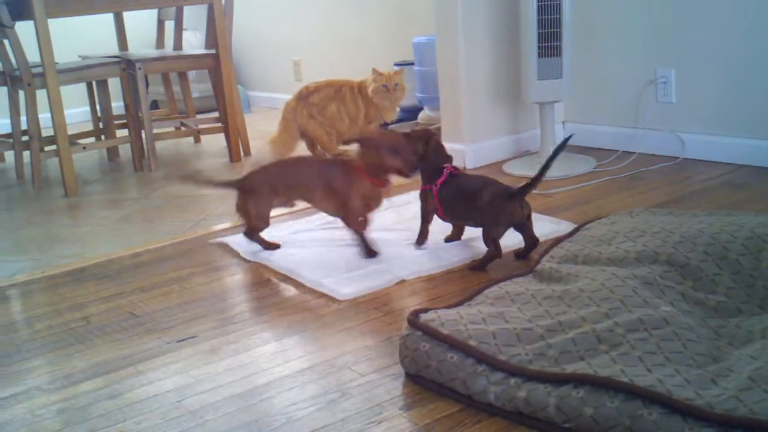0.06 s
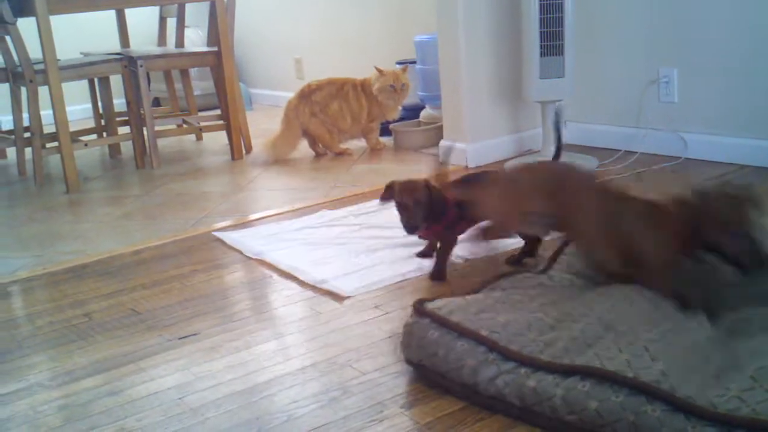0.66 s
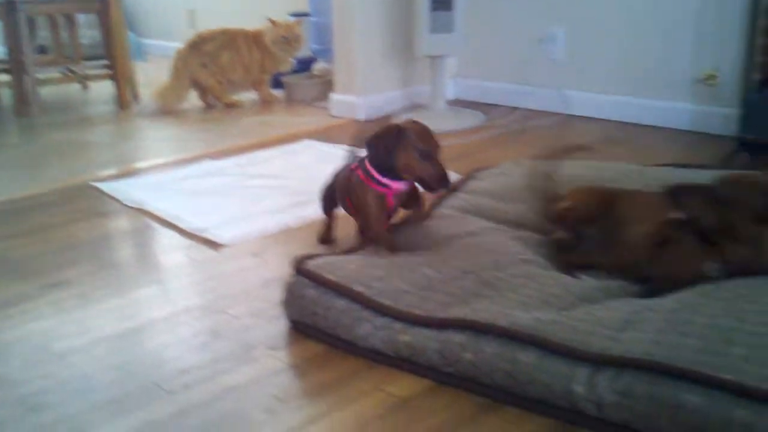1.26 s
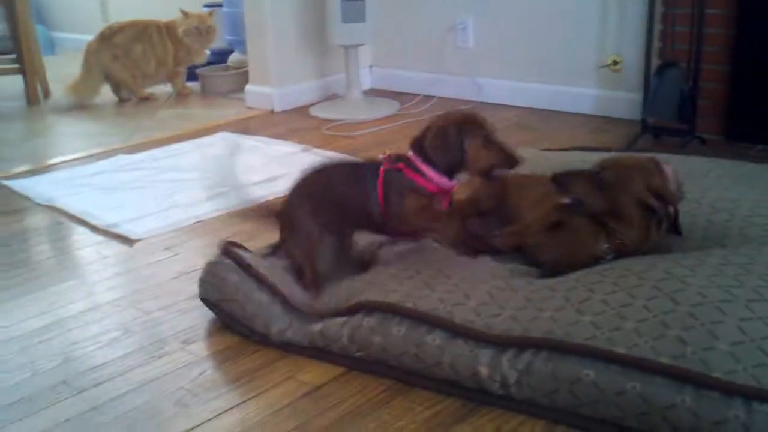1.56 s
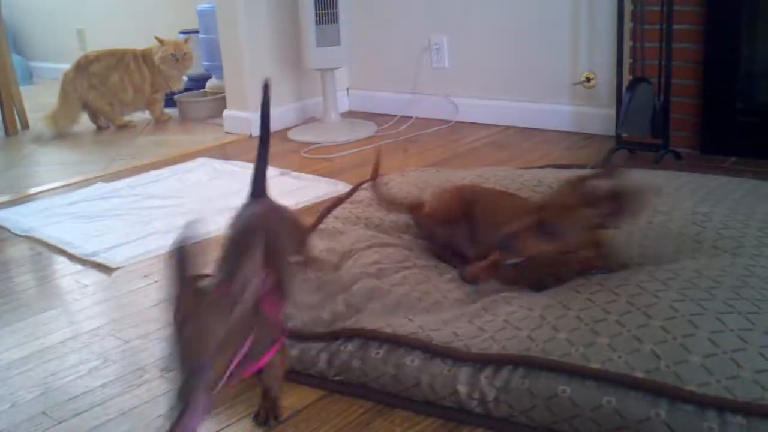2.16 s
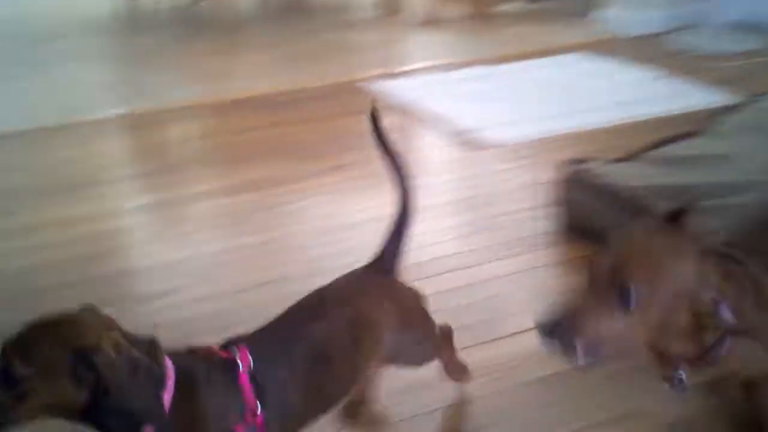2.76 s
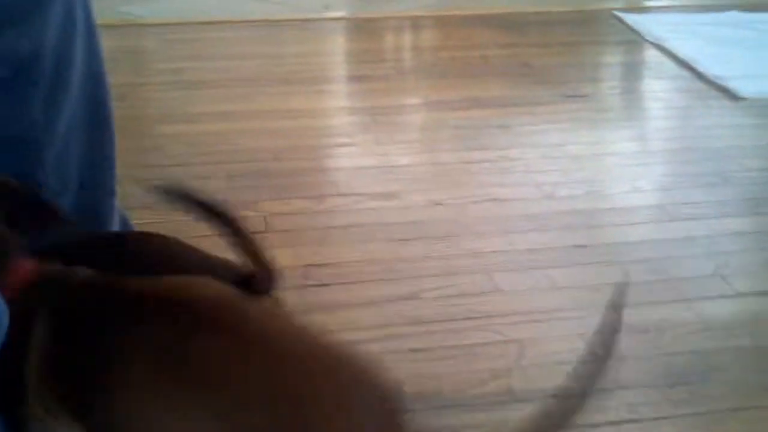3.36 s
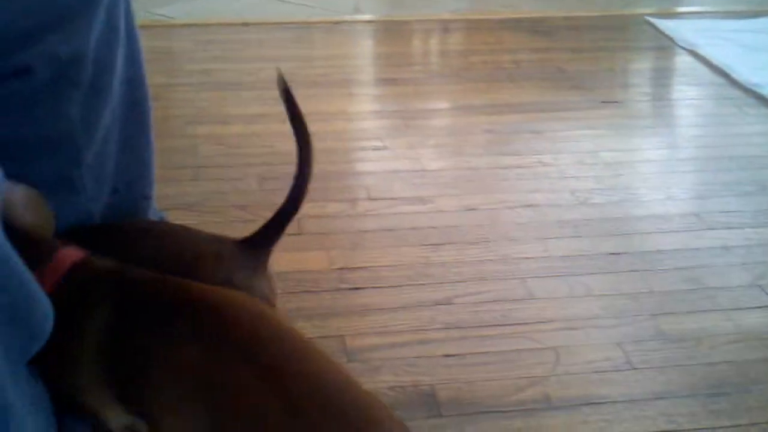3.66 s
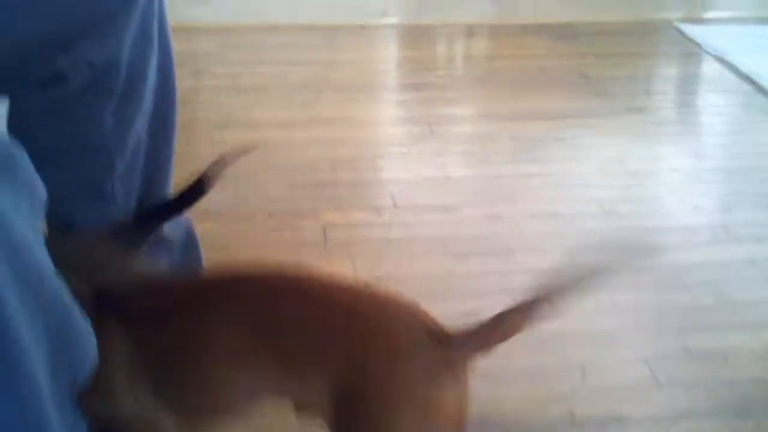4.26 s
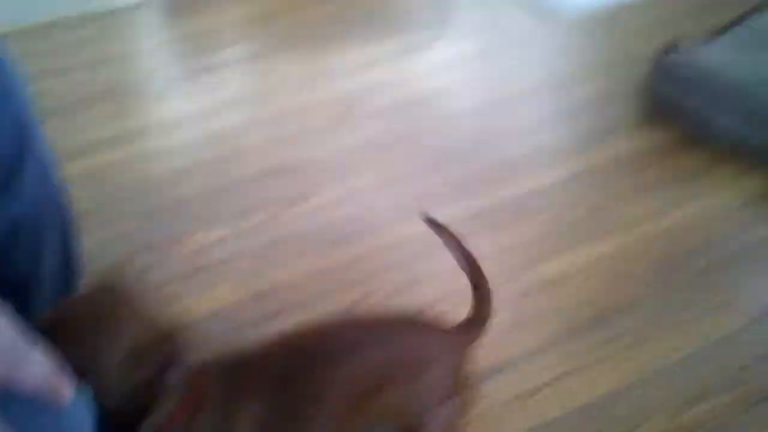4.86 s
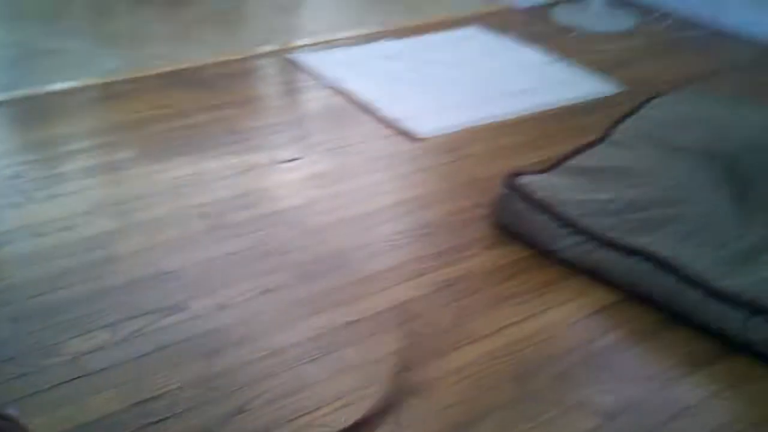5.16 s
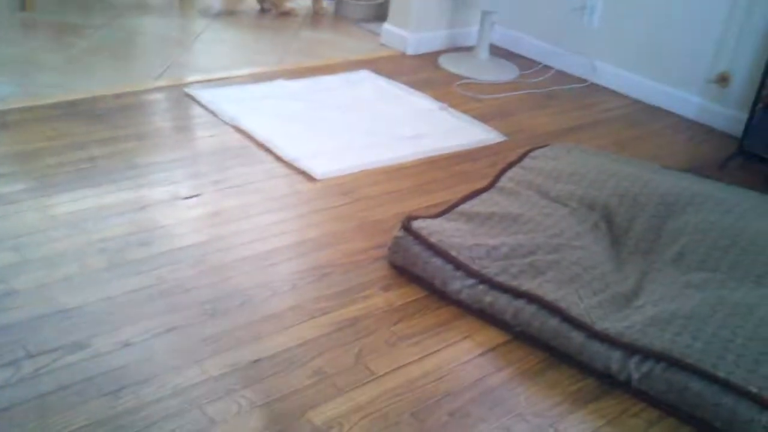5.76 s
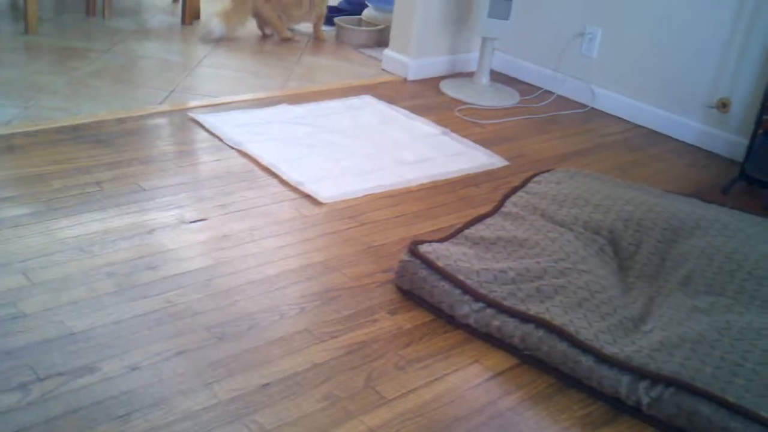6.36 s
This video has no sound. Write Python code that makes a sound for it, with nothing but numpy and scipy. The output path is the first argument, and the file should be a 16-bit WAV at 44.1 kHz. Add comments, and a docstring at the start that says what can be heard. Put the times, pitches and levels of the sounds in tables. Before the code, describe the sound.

Two small dogs tussle quietly in a bare living room, with soft paw thumps, a rustling floor pad and fur rubbing on a cushion. Then they scamper across the wooden floor close past the microphone, claws clicking and scraping sharply while a metal collar tag clinks. A few dry knocks and more clicks follow as they jostle, before the sound settles to soft brushing over faint house rumble.

```python
"""Two small dogs scuffling indoors.

They tussle on a cushion, scamper over a wooden floor past the microphone and jostle at someone's legs.
Claws click and scrape, paws thump the boards, a collar tag clinks, a floor pad rustles, fur and cloth
rub. A bare living room rings after each hit. Crossfeed widens the image of two close microphone ports."""
import sys
import numpy as np
from scipy import signal
from scipy.fft import rfft, irfft, next_fast_len
from scipy.io import wavfile
from scipy.ndimage import uniform_filter1d

SR = 44100
rng = np.random.default_rng(int(sys.argv[2]) if len(sys.argv) > 2 else 0)


def digitize_waveform(pressure):
    """Quantize a signal to 16-bit integers and store it at the path in sys.argv[1].

    Rows of a 2-D input are taken as channels; values are limited to [-1, 1].
    """
    field = np.atleast_2d(pressure).T
    bounded = np.clip(field, -1, 1)
    quanta = np.round(bounded * 32767).astype(np.int16)
    wavfile.write(sys.argv[1], SR, quanta)


N = 282681
HIT_N = SR // 2
T = np.arange(N) / SR
HIT_T = T[:HIT_N]


def undb(db):
    """Decibels to gain."""
    return 10 ** (np.asarray(db) / 20)


def along(points, hz):
    """Read (frequency [Hz], value) points on a log-frequency axis."""
    point_hz, value = np.transpose(points)
    return np.interp(np.log(hz + 1), np.log(point_hz), value)


def colour(x, points):
    """Minimum-phase filter through (frequency [Hz], gain [dB]) points."""
    size = 2 * next_fast_len(x.shape[-1], real=True)
    gain = undb(along(points, np.fft.rfftfreq(size, 1 / SR)))
    cepstrum = irfft(np.log(gain))
    cepstrum[1:size // 2] *= 2
    cepstrum[size // 2 + 1:] = 0
    return irfft(rfft(x, size) * np.exp(rfft(cepstrum)))[..., :x.shape[-1]]


def band(x, hz, q):
    """One resonance, at most at SR / 4."""
    return signal.lfilter(*signal.iirpeak(min(hz, SR / 4), max(q, .5), fs=SR), x)


def bell(hz, centre_hz, reach_oct):
    """Gaussian weight over octaves."""
    return np.exp(-(np.log2(hz / centre_hz) / reach_oct) ** 2)


def unit(x):
    """Scale to rms 1."""
    return x / np.sqrt(np.mean(x ** 2))


def peak(x, db):
    """Scale the loudest 2 ms to this level."""
    power = uniform_filter1d(np.mean(np.atleast_2d(x) ** 2, axis=0), size=88)
    return x * undb(db) / np.sqrt(power.max())


def fade(t60_s, t=HIT_T):
    """Exponential decay."""
    return np.exp(-np.log(1000) * t / np.maximum(t60_s, 1e-4))


def swell(length_s):
    """Half sine: a stroke gathers speed and slows."""
    return np.sin(np.pi * np.minimum(HIT_T / length_s, 1))


def add(track, start_s, sound):
    """Mix a sound into the track."""
    start = max(int(start_s * SR), 0)
    track[:, start:start + sound.shape[-1]] += sound[..., :N - start]


# Port difference against port sum: (frequency [Hz], gain [dB])
SIDE_SPECTRUM = [(60, 24.5), (130, -1), (280, 5.5), (600, -2.5), (1200, 1.5), (2500, 2), (10000, -0.5)]


def ports(pair):
    """Two unrelated signals become a diffuse field at the two ports."""
    side = colour(pair[1], SIDE_SPECTRUM)
    return np.array([pair[0] + side, pair[0] - side]) / np.sqrt(2)


def diffuse_noise(samples):
    """Noise arriving from all sides."""
    return ports(rng.standard_normal((2, samples)))


def friction(slips_per_s, scatter_db, spectrum, uneven_db):
    """Tiny slips of unequal size, coloured by what is rubbed, under wandering pressure."""
    sizes = undb(scatter_db * np.minimum(rng.exponential(size=N), 4))
    slips = sizes * (rng.random(N) < slips_per_s / SR)
    knots_s = np.arange(0, T[-1], .03)
    pressure = undb(uneven_db * np.interp(T, knots_s, rng.standard_normal(len(knots_s))))
    grains = ports(rng.standard_normal((2, N)) * slips)
    return pressure * unit(colour(grains, spectrum))


# Claw strikes: (time [s], peak [dB], treble [dB], ring [Hz], left minus right [dB])
CLAW_HITS = [(0.245, -53.5, -7, 3900, -4), (0.498, -53.5, -2, 6800, 3), (0.69, -57, -3, 4000, -2),
             (0.715, -57, -5, 4400, 0), (2.2734, -35, 10.5, 6760, 0), (2.527, -48, -2, 6500, 1),
             (2.548, -48, -8, 8950, -1), (2.589, -51, 1, 8900, -4), (2.613, -44, 6, 11400, -1),
             (2.6313, -40, 2, 9000, -11), (2.6994, -27, -5.5, 8100, -4), (2.7203, -24.5, 2.5, 3800, 3),
             (2.8161, -31, -7, 9800, 1), (2.887, -45.5, -2, 6300, -2), (2.941, -44, -16, 9000, 2),
             (2.951, -39.5, -8, 3900, -1), (2.9698, -32, -4, 8900, 1), (2.9754, -36.5, -5, 9250, 8),
             (3.023, -39, -6, 10500, 5), (3.0276, -22, 5.5, 8450, -0.5), (3.0303, -39, -9, 11500, 4),
             (3.041, -51, -9, 11600, 1), (3.051, -37, -6, 6900, 10), (3.0618, -33, -8.5, 8800, 3),
             (3.076, -46, -5, 9300, -3), (3.213, -43, -1, 11900, 3), (3.227, -41, -2, 7500, 2),
             (3.245, -30.5, 10, 7470, 2), (3.2505, -37, -13.5, 9200, 12.5), (3.256, -39, -1, 8100, -16),
             (3.272, -39.5, -10, 9000, 7), (3.881, -46.5, -4, 8350, 0), (4.132, -51.5, -14, 3100, 5),
             (4.601, -53, -30, 3430, 0), (4.6286, -46.5, -17.5, 4300, 0), (4.758, -59, 16, 13000, -2),
             (4.8306, -47, 23, 12500, 0), (4.926, -32.5, 2, 8750, 0), (4.9298, -38.5, 0, 11300, -8.5),
             (4.942, -43, -8, 11500, 2), (4.948, -49, -3, 3830, 14)]
# Claw on varnish: (frequency [Hz], gain [dB])
CLAW_SPECTRUM = [(300, 0), (1500, -21), (2800, -0.5), (3800, -3), (5200, -6.5), (6800, -1), (9000, -2),
                 (11500, -1.5), (14000, -5.5)]


def claws(rise_s=0.005, crack_t60_s=0.012, skid_db=-27, skid_t60_s=0.13, slips_per_s=1800, ring_db=4):
    """Each claw cracks on the varnish, rings at its own pitch and skids on in a fading chatter."""
    out = np.zeros((2, N))
    for time_s, db, treble_db, ring_hz, pan_db in CLAW_HITS:
        crack, chatter = rng.standard_normal((2, 2, HIT_N))
        slips = unit(rng.random(HIT_N) < slips_per_s / SR)
        skid = undb(skid_db) * chatter * slips * fade(skid_t60_s)
        hit = (crack * fade(crack_t60_s) + skid) * (1 - fade(rise_s)) ** 2
        hit += undb(ring_db) * band(hit, ring_hz, q=5)
        hit = colour(hit, CLAW_SPECTRUM)
        hit = colour(hit, [(3000, 0), (10000, treble_db)])
        pan = undb([[pan_db / 2], [-pan_db / 2]])
        add(out, time_s, peak(hit, db) * pan)
    return out


# Paw landings: (time [s], peak [dB], centre [Hz], base t60 [s], reach [oct])
PAW_HITS = [(0.094, -53, 139, 0.078, 0.35), (0.346, -48, 244, 0.1, 1), (0.471, -49, 860, 0.051, 0.85),
            (0.483, -43.5, 185, 0.058, 1.8), (0.506, -45.5, 230, 0.1, 1.3), (0.793, -44, 292, 0.06, 0.78),
            (0.875, -49, 302, 0.15, 0.81), (1.002, -48, 286, 0.22, 0.93), (1.14, -50, 364, 0.22, 2.9),
            (1.185, -45, 219, 0.097, 0.82), (1.205, -54, 242, 0.092, 0.78),
            (1.252, -49.5, 132, 0.043, 0.72), (1.335, -49.5, 310, 0.24, 0.68),
            (1.565, -54, 267, 0.12, 0.31), (1.661, -45.5, 450, 0.095, 0.58),
            (2.135, -46.5, 520, 0.076, 0.96), (2.389, -46, 218, 0.2, 0.86), (2.697, -43.5, 337, 0.15, 1.4),
            (2.716, -38.5, 264, 0.14, 2.7), (2.732, -40, 236, 0.042, 0.41),
            (2.792, -35.5, 742, 0.038, 0.25), (2.796, -29, 415, 0.088, 0.19), (2.802, -46, 143, 0.32, 0.59),
            (2.82, -50, 420, 0.13, 0.43), (2.953, -41.5, 260, 0.12, 1.8), (3.003, -40, 265, 0.049, 1.7),
            (3.096, -31, 216, 0.05, 1.03), (3.109, -37.5, 300, 0.05, 1.4), (3.193, -53, 171, 0.044, 0.43),
            (3.2265, -35.5, 337, 0.07, 0.79), (3.255, -41, 255, 0.072, 0.57), (3.371, -47, 980, 0.031, 0.7),
            (3.396, -41.5, 257, 0.096, 0.35), (3.414, -48.5, 118, 0.034, 1),
            (3.537, -51.5, 227, 0.073, 3.9), (4.523, -46, 490, 0.046, 0.31),
            (4.603, -46.5, 417, 0.019, 1.3), (4.926, -48.5, 594, 0.19, 1.7)]
# Floorboard modes: (frequency [Hz], level [dB], t60 over base t60 [ratio])
BOARD_MODES = [(115.4, -1.5, 5.3), (143, -4.5, 4.3), (184.7, 0, 0.92), (240.5, 2, 0.95), (304, -1, 1.12),
               (371, -4.5, 1.27), (413.6, -3.5, 0.95), (505.6, -1, 1.3), (571, -5.5, 2.2), (651, -2, 0.66),
               (760, -5, 1.2), (976, 2.5, 0.6), (1236, -24, 0.28), (1710, 9, 0.15)]


def paws(pad_db=-6, pad_t60_s=0.04, rise_s=0.0033, shape_spread=0.49, detune_hz=6):
    """A soft pad slaps the floor; its softness picks which board modes answer."""
    out = np.zeros((2, N))
    mode_hz, mode_db, t60_ratio = np.transpose(BOARD_MODES)[:, :, None]
    for time_s, db, centre_hz, t60_s, reach_oct in PAW_HITS:
        shape = rng.choice([-1, 1], mode_hz.shape) + shape_spread * rng.standard_normal((2, *mode_hz.shape))
        weight = undb(mode_db) * bell(mode_hz, centre_hz, reach_oct)
        spot_hz = mode_hz + detune_hz * rng.standard_normal(mode_hz.shape)  # each spot has its own tuning
        modes = shape * weight * fade(t60_s * t60_ratio) * np.sin(2 * np.pi * spot_hz * HIT_T)
        pad = band(diffuse_noise(HIT_N) * fade(pad_t60_s), centre_hz, q=1 / reach_oct)
        thump = peak(modes.sum(axis=1), 0) + peak(pad, pad_db)
        add(out, time_s, peak(thump * (1 - fade(rise_s)), db))
    return out


# Close knocks: (time [s], peak [dB], clack [Hz], thud trim [dB], crack [dB])
KNOCK_HITS = [(1.662, -47, 514, -12, -11), (2.721, -34, 1650, 2, -8), (3.0972, -34, 624, -6, -9),
              (3.2272, -41.5, 770, -3.5, -16), (3.8765, -26.5, 1000, 6, -12.5), (4.134, -49, 1700, -4, 0),
              (4.497, -53.5, 1520, -21, -16), (4.5134, -40.5, 500, -18, -24), (4.595, -39, 706, 4, 5),
              (4.6016, -39, 1430, 0.5, -0.5), (4.6279, -39.5, 870, -18, -6), (4.683, -53.5, 950, -12, -9),
              (4.778, -45, 627, 3.5, 2), (4.7825, -53, 1100, -6, -10), (5.442, -65, 880, -10, -2)]


def knocks(clack_cycles=8, clack_rise_s=0.0056, thud_hz=215, thud_db=3, thud_lag_s=0.0029):
    """A dry clack and a crack, then a low thud that rocks the ports against each other."""
    out = np.zeros((2, N))
    thud_t = np.maximum(HIT_T - thud_lag_s, 0)
    thud_envelope = fade(0.011, thud_t) * (1 - fade(0.0046, thud_t))
    thud = np.sin(2 * np.pi * thud_hz * thud_t) * thud_envelope * np.array([[-0.3], [1]])
    for time_s, db, hz, trim_db, crack_db in KNOCK_HITS:
        clack = np.sin(2 * np.pi * hz * HIT_T) * fade(clack_cycles / hz) * (1 - fade(clack_rise_s))
        crack = band(diffuse_noise(HIT_N) * fade(t60_s=0.1), 0.55 * hz, q=1)
        knock = peak(clack, 0) + peak(crack, crack_db) + peak(thud, thud_db + trim_db)
        add(out, time_s, peak(knock, db))
    return out


# Tag striking its ring: (time [s], level [dB], lower mode [dB], overall t60 [s], free ringing [s])
TAG_HITS = [(0.186, -56, 0, .2, .07), (0.62, -60, 3, .15, .04), (2.228, -58, -2, .12, .03),
            (2.578, -39.5, -18, .035, .004), (2.613, -38.5, -22, .06, .006), (2.6325, -25.5, -21, .6, .018),
            (2.685, -40, -14, .3, .035), (3.214, -33, -14, .035, .003), (3.305, -34, -2, .04, .005),
            (3.57, -59, -5, .08, .03)]
# Tag modes: (lower [Hz], middle [Hz], upper [Hz])
TAG_MODES_HZ = (6400, 7410, 9000)


def collar_tag(lower_t60_s=0.49, choke_t60_s=0.09, upper_t60_s=0.014, upper_db=-4, port_lag_s=3.4e-5):
    """A metal tag clinks in three modes; the top one dies at once, fur chokes the middle one."""
    out = np.zeros((2, N))
    port_t = HIT_T - np.array([[0], [port_lag_s]])  # the tag hangs to one side
    for time_s, db, lower_db, t60_s, free_s in TAG_HITS:
        lower, middle, upper = (np.sin(2 * np.pi * hz * port_t) for hz in TAG_MODES_HZ)
        lower *= undb(lower_db) * fade(lower_t60_s)
        middle *= fade(choke_t60_s, np.maximum(HIT_T - free_s, 0))
        upper *= undb(upper_db) * fade(upper_t60_s)
        add(out, time_s, undb(db) * (lower + middle + upper) * fade(t60_s))
    return out


# Claw drags: (time [s], peak [dB], length [s], centre [Hz])
CLAW_DRAGS = [(0.837, -72, .07, 1510), (1.113, -55, .022, 1700), (2.948, -49, .022, 1420),
              (2.971, -45, .012, 1630), (2.99, -46, .012, 1120), (3, -51, .028, 1390),
              (3.024, -43.5, .008, 1250), (3.042, -52, .022, 1470), (3.250, -46, .014, 1040),
              (3.309, -55.5, .03, 1060)]
# Wood modes under a claw: (frequency [Hz], level [dB], Q)
WOOD_MODES = [(815, 23, 8.7), (980, -5, 3.8), (1262, -5.5, 30), (1580, -23, 16), (1718, -7, 6.1),
              (2130, -24, 7.8)]


def scrapes(slips_per_s=330, jitter=0.49, scatter_db=3, reach_oct=0.24, grit_db=-13):
    """A dragged claw sticks and slips; every slip rings the wood."""
    out = np.zeros((2, N))
    for time_s, db, length_s, centre_hz in CLAW_DRAGS:
        gaps, sizes = rng.standard_normal((2, 40))
        slip_s = np.cumsum(np.exp(jitter * gaps)) / slips_per_s
        slip_s -= slip_s[0]
        in_drag = slip_s <= length_s
        slips = np.zeros(HIT_N)
        slips[(slip_s[in_drag] * SR).astype(int)] = undb(scatter_db * sizes[in_drag])
        wood = sum(undb(mode_db) * bell(hz, centre_hz, reach_oct) * band(slips, hz, q)
                   for hz, mode_db, q in WOOD_MODES)
        grit = band(slips, centre_hz, q=0.82)
        add(out, time_s, peak(peak(wood, 0) + peak(grit, grit_db), db))
    return out


# Paw and fur slides: (midpoint [s], level [dB], length [s], treble [dB])
SLIDE_STROKES = [(0.866, -59, 0.38, -20), (2.215, -56, 0.12, -12), (2.356, -60.5, 0.12, -2.5),
                 (2.554, -56, 0.15, -5), (2.911, -50.5, 0.15, -9), (2.985, -32.5, 0.039, -15),
                 (3.095, -45, 0.085, -15), (3.283, -47.5, 0.19, -2), (3.434, -44.5, 0.11, -10),
                 (3.587, -55.5, 0.063, -17), (3.671, -49, 0.11, -12), (3.933, -57.5, 0.21, -8.5),
                 (4.337, -57.5, 0.46, -8.5), (4.854, -52.5, 0.073, -19), (4.96, -39.5, 0.062, -16.5),
                 (6.102, -46.5, 0.11, -12.5), (6.27, -53, 0.092, -28)]
# Fur hiss: (frequency [Hz], gain [dB])
FUR_SPECTRUM = [(150, -25), (1200, -9), (2800, -10), (3800, -4.5), (5200, -8), (6600, 0.5), (8800, 3),
                (11500, -2), (14000, -3.5)]


def slides():
    """Sliding paws and brushing fur hiss in single strokes, louder as they move faster."""
    out = np.zeros((2, N))
    hiss = friction(4000, 0.65, FUR_SPECTRUM, uneven_db=4)
    for mid_s, db, length_s, treble_db in SLIDE_STROKES:
        start = rng.integers(N - HIT_N)
        stroke = hiss[:, start:start + HIT_N] * swell(length_s)
        add(out, mid_s - length_s / 2, undb(db) * colour(stroke, [(4000, 0), (11000, treble_db)]))
    return out


# Swipes over cloth: (midpoint [s], level [dB], length [s], centre [Hz])
SWIPE_STROKES = [(0.258, -60.5, 0.083, 1530), (0.393, -60, 0.055, 1420), (0.51, -61, 0.06, 557),
                 (0.871, -64, 0.049, 4020), (0.908, -61, 0.13, 480), (1.268, -61.5, .14, 430),
                 (1.128, -60.5, 0.059, 3030), (2.542, -57, 0.086, 870), (2.758, -52.5, 0.12, 1450),
                 (3.02, -56, 0.11, 1350), (3.298, -57, .08, 745), (3.571, -60, 0.067, 3200),
                 (4.983, -55, 0.076, 790), (6.015, -53.5, 0.14, 750), (6.181, -57, 0.15, 750),
                 (6.333, -64, 0.077, 895)]


def swipes(q=1.37):
    """Paws and fur swipe over cloth: friction round one pitch swells and dies away."""
    out = np.zeros((2, N))
    for mid_s, db, length_s, hz in SWIPE_STROKES:
        rub = unit(band(band(diffuse_noise(HIT_N), hz, q), hz, q))
        add(out, mid_s - length_s / 2, undb(db) * swell(length_s) * rub)
    return out


# Floor pad underfoot: (time [s], level [dB])
PAD_LEVELS = [(0, -64.5), (0.1, -63), (0.22, -59.5), (0.32, -70), (0.39, -59.5), (0.5, -64), (0.63, -66.5),
              (0.72, -56), (0.83, -70), (1.25, -78)]
# Pad rustle: (frequency [Hz], gain [dB])
PAD_SPECTRUM = [(1200, -10), (2800, -8), (3800, -5.5), (5200, -8), (6600, -0.5), (8800, -0.5),
                (11500, -3.5), (14000, -5.5)]


def pad_rustle(gain_db=3.5, crinkle_db=-8):
    """The floor pad rustles finely under the dogs' feet, with sparser crinkles in it."""
    level_db = np.interp(T, *np.transpose(PAD_LEVELS), right=-120)
    fine = friction(9000, 1.0, PAD_SPECTRUM, uneven_db=1.5)
    crinkles = friction(190, 1.3, PAD_SPECTRUM, uneven_db=1)
    return undb(level_db + gain_db) * (fine + undb(crinkle_db) * crinkles)


# How hard the dogs tussle: (time [s], effort [dB])
TUSSLE_EFFORT = [(0, -6.5), (0.3, 1.5), (0.63, -1), (0.9, 7), (1.2, 1.5), (1.42, -1.5), (1.75, 1.5),
                 (2.08, -3), (2.5, 4), (2.67, 3), (3.05, 10), (3.55, -5.5), (3.84, -7), (4.35, 5),
                 (4.95, 2), (5.15, -5), (5.88, -7), (6.4, 0.5)]
# Shifting bodies: (frequency [Hz], gain [dB])
BODY_SPECTRUM = [(30, -57.5), (55, -27), (80, -6), (115, -3), (240, -2), (430, -2.5), (700, -10.5),
                 (1400, -44)]
# Rubbed cloth: (frequency [Hz], gain [dB])
CLOTH_SPECTRUM = [(250, -22.5), (600, 4), (850, 5.5), (1300, -1.5), (2000, -4), (3200, -11.5),
                  (6000, -29.5)]


def scuffle(base_db=-62.5, body_db=3, cloth_db=-5, fur_db=-8):
    """The harder the dogs tussle, the more bodies shift, cloth rubs and fur hisses."""
    effort_db = np.interp(T, *np.transpose(TUSSLE_EFFORT))
    bodies = undb(body_db + 0.72 * effort_db) * friction(1500, 1.0, BODY_SPECTRUM, uneven_db=2)
    cloth = undb(cloth_db + effort_db) * friction(3500, 0.5, CLOTH_SPECTRUM, uneven_db=4)
    fur = undb(fur_db + 0.66 * effort_db) * friction(14000, 0.49, FUR_SPECTRUM, uneven_db=3)
    return undb(base_db) * (bodies + cloth + fur)


# House background: (frequency [Hz], gain [dB])
AIR_SPECTRUM = [(25, -6), (55, -14.5), (85, -19), (118, 11), (160, -3.5), (350, -5), (700, -9.5),
                (1500, -13.5), (3000, -14.5), (5200, -21), (8800, -20), (14000, -15.5)]


def air(level_db=-58):
    """The quiet rumble and hiss of the house."""
    return undb(level_db) * unit(colour(diffuse_noise(N), AIR_SPECTRUM))


# Living room decay: (frequency [Hz], t60 [s])
ROOM_DECAY = [(100, 0.59), (500, 0.4), (2000, 0.53), (7000, 0.59), (14000, 0.46)]


def room(x, wet_db, gap_s, dense_s=0.054):
    """Add sparse early reflections that thicken into a diffuse tail."""
    t = T[:SR]
    density = np.clip((t / dense_s) ** 2, .02, 1)
    echoes = rng.standard_normal((2, SR)) * (rng.random((2, SR)) < density)
    echoes = echoes / np.sqrt(density) * (t > gap_s)
    hz, frame_s, frames = signal.stft(echoes, SR)
    decay = fade(along(ROOM_DECAY, hz)[:, None], frame_s)
    tail = signal.istft(frames * decay, SR)[1][:, :SR]
    response = unit(ports(tail)) / np.sqrt(SR)
    return x + undb(wet_db) * signal.fftconvolve(x, response, axes=1)[:, :N]


def scene():
    """All sources in the living room; the close knocks excite it little, scuffle and air stay dry."""
    return (room(claws(), wet_db=-6, gap_s=0.011)
            + room(paws(), wet_db=-0.5, gap_s=0.0076)
            + room(knocks(), wet_db=-33, gap_s=0.0028)
            + room(collar_tag(), wet_db=-7.5, gap_s=0.024)
            + room(scrapes(), wet_db=2.5, gap_s=0.0068)
            + room(swipes() + slides() + pad_rustle(), wet_db=-4.5, gap_s=0.0043)
            + scuffle() + air())


def widen(x, feed, lag_samples=16.9):
    """Each channel loses a delayed share of the other."""
    spectra = rfft(x, 2 * N)
    delay = np.exp(-2j * np.pi * np.fft.rfftfreq(2 * N) * lag_samples)
    return irfft((spectra - feed * delay * spectra[::-1]) / np.sqrt(1 + feed ** 2))[:, :N]


# Crossfeed between the ports: (frequency [Hz], share [dB])
FEED_SPECTRUM = [(100, -6.5), (400, -26), (1150, 0), (3950, 0), (5000, -9), (8000, -16), (14000, -13)]


def record(dry, loud_feed_db=-3, knee_db=-40, bottom_hz=80, top_hz=13800):
    """Crossfeed widens the image, loud treble more deeply; rumble and top are cut."""
    hz = np.fft.rfftfreq(2 * N, 1 / SR)
    feed = undb(np.minimum(along(FEED_SPECTRUM, hz), 0))
    loud_feed = np.maximum(feed, undb(loud_feed_db) * (hz > 3000))
    treble = band(dry, 9000, q=1)
    power = np.abs(uniform_filter1d(np.mean(treble ** 2, axis=0), size=1024))
    loud_share = power / (power + undb(knee_db) ** 2)
    wide = (1 - loud_share) * widen(dry, feed) + loud_share * widen(dry, loud_feed)
    highpass = signal.butter(8, bottom_hz, "high", fs=SR, output="sos")
    lowpass = signal.ellip(7, .3, 60, top_hz, fs=SR, output="sos")
    return signal.sosfilt(np.vstack([highpass, lowpass]), wide)


dry = scene()
out = record(dry)
digitize_waveform(out)
```